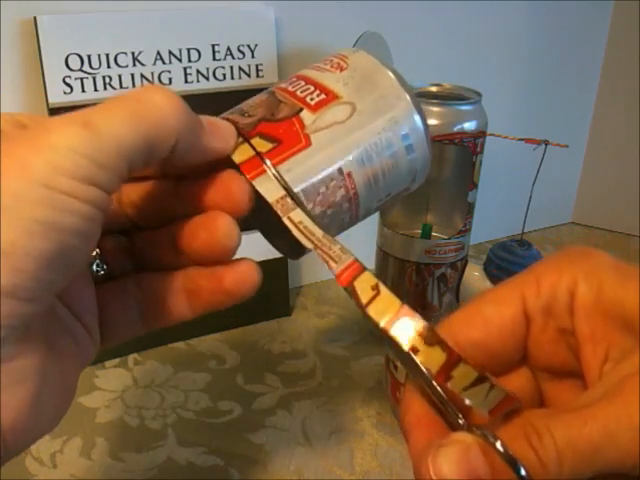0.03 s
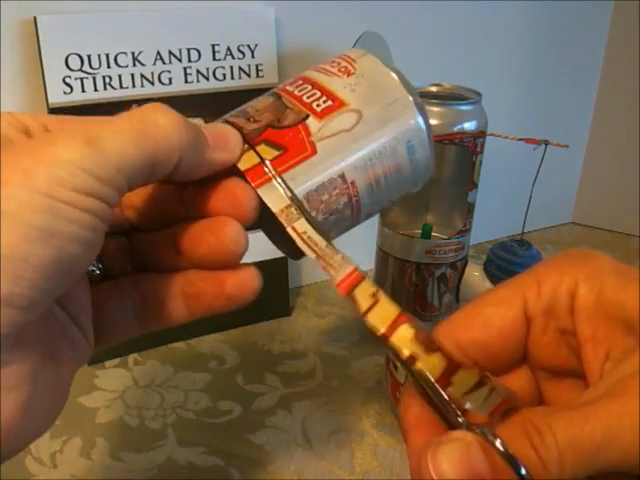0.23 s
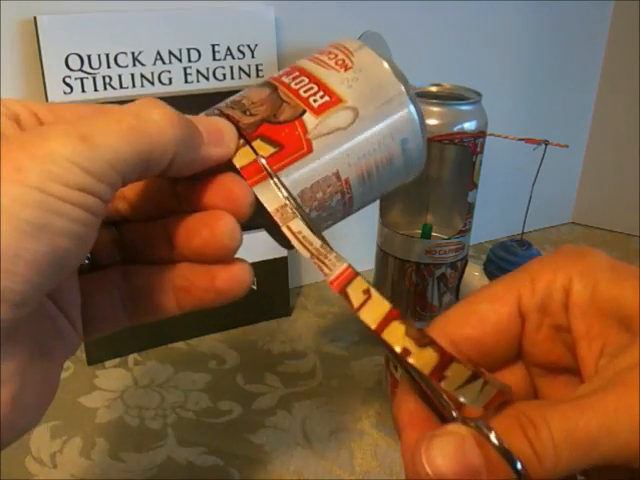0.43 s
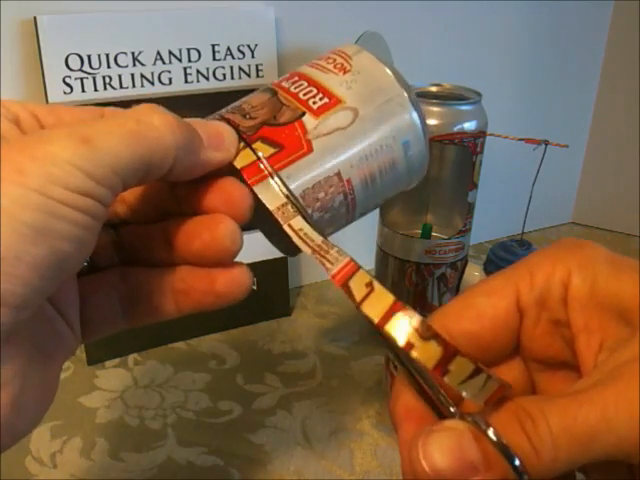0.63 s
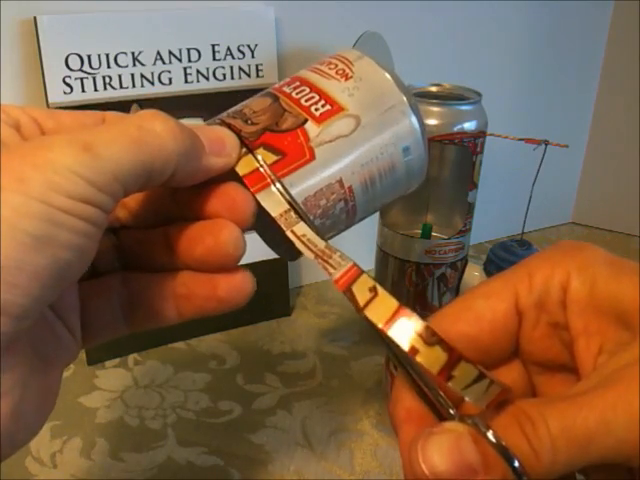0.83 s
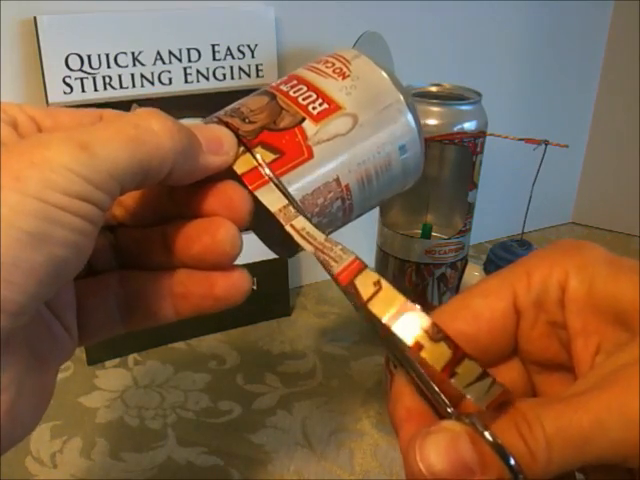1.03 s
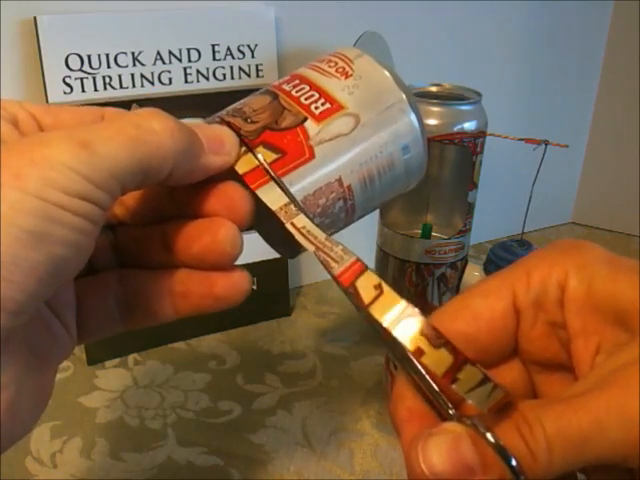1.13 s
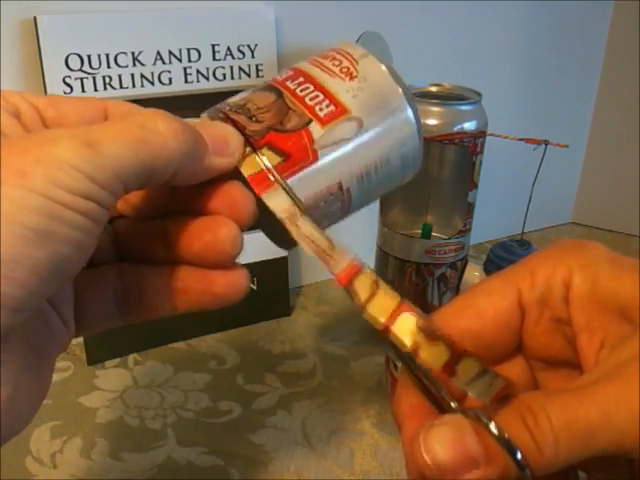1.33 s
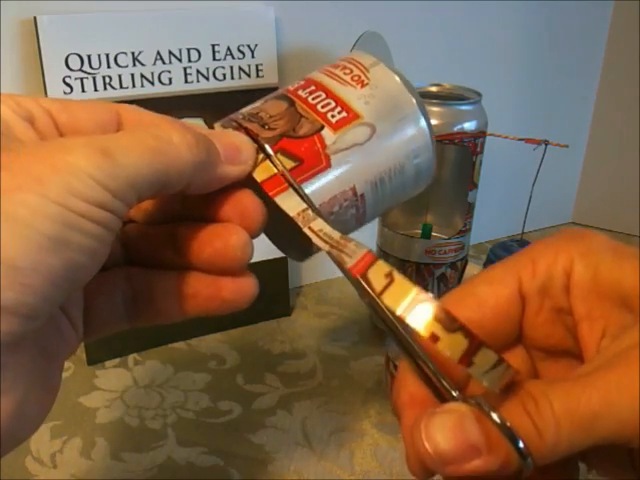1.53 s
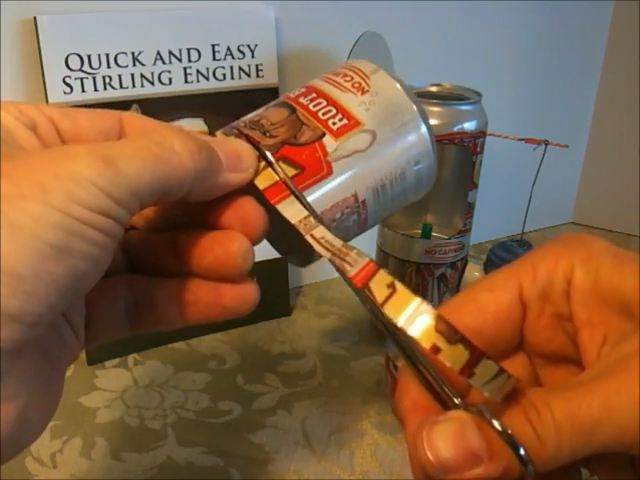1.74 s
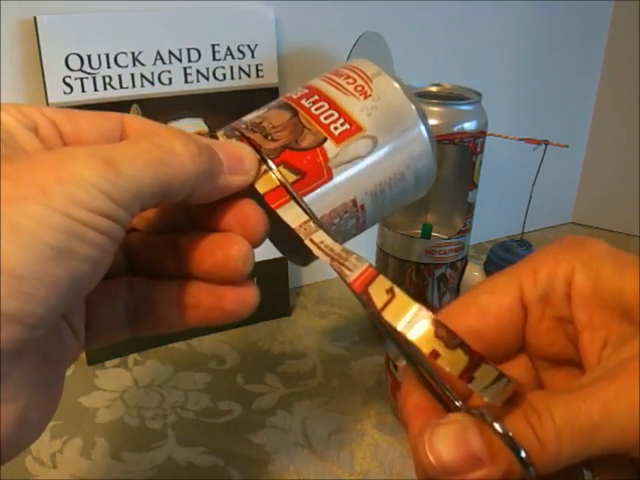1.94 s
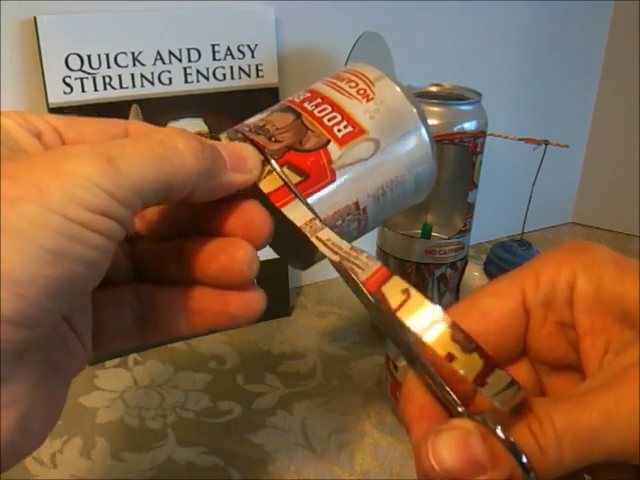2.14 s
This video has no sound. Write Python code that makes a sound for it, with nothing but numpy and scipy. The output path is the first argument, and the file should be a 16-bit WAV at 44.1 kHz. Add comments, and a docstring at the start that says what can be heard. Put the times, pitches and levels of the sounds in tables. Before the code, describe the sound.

Scissors snipping through a thin aluminium can in short, irregular metallic crunches.

```python
"""Scissors cutting an aluminium can

Scissors cut a thin hand-held can in a small quiet room. The blades rub and crunch through the sheet in
bursts of tiny fractures, and the sheet snaps as it gives way. Each crack excites the modes of can wall
and blades; sliding steel sings and the grip knocks softly. Table and walls reflect it all over a faint
steady hiss and hum."""
import sys
import numpy as np
from scipy import signal
from scipy.fft import rfft, irfft
from scipy.io import wavfile
from scipy.ndimage import uniform_filter1d

SR = 44100
rng = np.random.default_rng(int(sys.argv[2]) if len(sys.argv) > 2 else 0)


def master(y):
    """Save y as 16-bit WAV."""
    cut = np.clip(np.atleast_2d(y).T, -1, 1)
    pcm = np.round(cut * 32767)  # scale
    wavfile.write(sys.argv[1], SR, pcm.astype(np.int16))


N = 97020


def snaps(size=3072, lead_s=.008):
    """Brittle release of stress: the sheet gives way in cracks that die within milliseconds."""
    # Snaps; a low ring is the can wall, a high one the blades:
    # (time [s], level [dB], decay [s], bass [dB], ring [dB], ring pitch [Hz], treble [dB])
    fractures = [ (0.0884, -40.5, 0.002, 2.5, -30, 1010, -8.5), (0.1587, -43, 0.0039, -4, -1.5, 1000, -9),
                 (0.212, -21, 0.0026, -5, 9, 1125, 10), (0.5252, -31.5, 0.0031, -4, -3, 980, -4),
                 (.536, -35, 0.0038, 2, 3, 865, -5.5), (.5776, -38.5, 0.0019, 7, 11, 910, -2.5),
                 (0.6176, -41, 0.0033, -10, 1.5, 980, -17.5), (0.694, -60, .003, -2, 16.5, 990, -25.5),
                 (.7501, -31.5, .003, 7, 14, 864, -30.5), (0.8014, -33.5, 0.00503, 0.5, 7.5, 996, -6),
                 (.860, -52, 0.0042, -6, 6, 970, 0.5), (1.092, -53, .004, -8, 14.5, 6500, -9.5),
                 (1.194, -55.5, 0.0022, 7, 7, 1000, -10), (1.3384, -48.5, 0.0058, -22, 10, 5700, 4),
                 (1.3918, -39.5, 0.0017, -12, 13, 1190, -4), (1.580, -44.5, 0.0041, 2.5, 5, 5400, -5),
                 (1.608, -41, 0.0056, -6, 13, 6970, 0), (1.617, -37.5, .005, -2, 3, 6800, -15),
                 (1.645, -52, 0.0036, 1.5, 15, 1030, 0), (1.9633, -42, 0.0041, -0.5, -8, 860, -8),
                 (1.9789, -48, 0.0031, 11.5, 14, 824, -23.5), (1.9908, -36.5, 0.0016, -7.5, -8.5, 1000, -7),
                 (2.0358, -53, .002, 3, 1, 1000, -8), (2.061, -49, 0.0059, 2, -3, 960, -10)]
    out = np.zeros(N)
    for s, db, decay_s, *tone in fractures:
        add(out, s - lead_s, colour(amp(db) * crack(size, lead_s, decay_s), *tone))
    return out


def crack(size, lead_s, decay_s, attack_s=.0008, passes=6):
    """A brief impulse is broadband: a decaying noise burst with a flat spectrum, after a lead-in."""
    noise = rng.standard_normal(size)
    t = np.maximum(np.arange(size) / SR - lead_s, 0)
    envelope = np.exp(-t / decay_s) * np.minimum(t / attack_s, 1)
    for _ in range(passes):  # flatten in frequency and in time by turns
        phase = np.angle(rfft(noise * envelope))
        burst = irfft(np.exp(1j * phase))
        local_power = abs(uniform_filter1d(burst ** 2, size=41))
        noise = burst / np.sqrt(local_power + 1e-20)
    return burst * np.linalg.norm(envelope)


def crunches(size=6000):
    """Crackling noise: the closing blades set off a random train of tiny fractures of uneven size."""
    # Rubs and crunches: (time [s], length [s], level [dB], bass [dB], wall ring [dB], treble [dB])
    bursts = [ (.002, 0.087, -61, 2.5, -5, 1.5), (.082, 0.015, -55, 6, 6, -0.5),
              (0.167, 0.012, -60.5, 17.5, 3, -6), (0.2108, 0.0013, -33, -9.5, 3, 18.5),
              (.233, 0.0041, -39.5, 0.5, -1.5, -8.5), (0.479, 0.035, -65.5, -2, 7, -5.5),
              (0.5713, 0.005, -45, 2, 12, -21), (0.746, .007, -44, 0, 15.5, -1.5),
              (.785, 0.0064, -50, 12, 17, -45), (1.041, 0.033, -67, 4.5, 2, -7.5),
              (1.0845, 0.015, -50, -0.5, -0.5, -7), (1.106, 0.022, -53.5, 1.5, 4, -5),
              (1.148, 0.016, -61.5, 1, 7.5, -11), (1.357, .024, -63.5, -3, 7, -16),
              (1.385, 0.009, -49, -27, 12, -15), (1.415, 0.027, -40.5, -1, 7.5, -5),
              (1.437, 0.036, -46.5, 10, 12, -6.5), (1.474, 0.02, -57, 17.5, 4, -4),
              (1.52, .06, -66.5, 6.5, -13, -4), (1.948, 0.05, -53.5, 5.5, -1, -17),
              (2.15, 0.012, -70, -4, -13.5, -19)]
    grains_per_s, spread_db, wall_hz = 5000, 3.0, 990
    swell_share, release_s = 0.41, .003
    out, t = np.zeros(N), np.arange(size) / SR
    for s, length, db, bass_db, wall_db, treble_db in bursts:
        strength = amp(spread_db * np.minimum(rng.exponential(1, size), 3))
        polarity = rng.choice([-1, 1], size)
        grains = unit_rms(strength * polarity * (rng.random(size) < grains_per_s / SR))
        swell = np.minimum(t / (swell_share * length), 1)
        release = np.exp(-np.maximum(t - length, 0) / release_s)
        add(out, s, colour(amp(db) * swell * release * grains, bass_db, wall_db, wall_hz, treble_db))
    return out


def colour(x, bass_db, ring_db, ring_hz, treble_db, size=4096):
    """Minimum-phase filtering gives an event its bass, broad ring of wall or blades, and treble."""
    # Spectrum common to all cracks: (frequency [Hz], level [dB])
    crack_spectrum = [(25, -14.5), (90, -13), (140, -22.5), (200, -2.5), (300, 2), (420, 2), (650, 2.5),
                      (1350, 2), (1700, -3), (2200, 0.5), (2600, -3), (3100, 5), (3600, -1), (5000, 0),
                      (6500, 0), (8500, -1), (11000, -6.5), (13300, -4), (16000, -10.5)]
    bass_from_hz, bass_to_hz, treble_hz, ring_octaves = 130, 640, 9180, 0.23
    hz = abs(np.fft.fftfreq(size, 1 / SR)) + 1
    bass = bass_db / (1 + (hz / bass_to_hz) ** 4 + (bass_from_hz / hz) ** 4)
    ring = ring_db * np.exp(-.5 * (np.log2(hz / ring_hz) / ring_octaves) ** 2)
    treble = treble_db / (1 + (treble_hz / hz) ** 7)
    gain = amp(curve_at(crack_spectrum, hz) + bass + ring + treble)
    minimum_phase = np.exp(np.conj(signal.hilbert(np.log(gain))))
    response = np.fft.ifft(minimum_phase).real
    return signal.fftconvolve(x, response[:size // 2])


def metal(x):
    """Modal superposition: each crack is heard directly and through the modes of can and blades."""
    # Modes of can and blades: (frequency [Hz], peak gain [dB], T60 [s])
    modes = [(210, 0, .25), (431, 2, .11), (570, -4, .1), (850, 0, .08), (1012, -2, .09), (1137, -4, .11),
             (1320, -3, .08), (2155, 2, .06), (3195, -2, .11), (3919, -4, .11), (4640, 0, .06),
             (5035, 1, .05), (5172, 2, .07), (6450, 1, .04)]
    return x + sum(amp(db) * resonate(x, hz, width_hz=2.2 / t60) for hz, db, t60 in modes)


def resonate(x, hz, width_hz):
    """A damped oscillator responds most at its natural frequency, here with a gain of one."""
    radius = np.exp(-np.pi * width_hz / SR)
    pole = radius * np.exp(2j * np.pi * hz / SR)
    return 2 * signal.lfilter([1 - radius], [1, -pole], x).real


def slides(size=6000, blade_hz=3177, width_hz=86):
    """Friction of steel sliding on steel excites one narrow blade resonance."""
    # Blade strokes: (time [s], length [s], level [dB])
    strokes = [(.002, 0.073, -64.5), (0.442, 0.1, -75), (1.361, 0.052, -57), (1.51, 0.067, -77),
               (2.015, .09, -74)]
    out, t = np.zeros(N), np.arange(size) / SR
    for s, length, db in strokes:
        friction = rng.standard_normal(size)
        tone = resonate(resonate(friction, blade_hz, width_hz), blade_hz, width_hz)
        arch = np.sin(np.pi * np.minimum(t / length, 1))
        add(out, s, amp(db) * unit_rms(tone) * arch)
    return out


def thuds(size=9000, hz=205.6, attack_s=0.0084, decay_s=0.035):
    """Damped vibration: a shift of the grip gives a soft, low knock."""
    # Knocks of the hands on handles and can: (time [s], level [dB])
    knocks = [(0.086, -61.5), (1.093, -60.5), (1.348, -56.5), (1.443, -53), (1.958, -50.5), (2.059, -63.5)]
    out, t = np.zeros(N), np.arange(size) / SR
    envelope = np.minimum(t / attack_s, 1) * np.exp(-t / decay_s)
    for s, db in knocks:
        add(out, s, amp(db) * np.sin(2 * np.pi * hz * t) * envelope)
    return out


def room(x, stretches=22):
    """Time-varying paths: the hands keep moving, so each stretch meets its own reflections."""
    out = x.copy()
    for part in np.array_split(np.arange(N), stretches):
        add(out, part[0] / SR, signal.fftconvolve(x[part], echoes()))
    return out


def echoes(size=22050):
    """Impulse response: early reflections from can, hands and table, then the room's diffuse tail."""
    # Reverberation time of the room: (frequency [Hz], T60 [s])
    room_t60 = [(150, 0.14), (500, 0.45), (1400, 0.33), (4000, 0.32), (9000, 0.25), (15000, 0.16)]
    early_t60_s, tail_db, build_s = 0.055, -13.5, 0.032
    t = np.arange(size) / SR
    arrivals = rng.standard_normal(size) * (rng.random(size) < .15) * (t > .001)
    early = arrivals * amp(-60 * t / early_t60_s)
    hz, frame_s, bands = signal.stft(rng.standard_normal(size), SR, nperseg=256)
    decay = amp(-60 * frame_s / curve_at(room_t60, hz)[:, None])
    tail = signal.istft(bands * decay, SR, nperseg=256)[1][:size]
    tail *= np.minimum(t / build_s, 1)
    return early / np.linalg.norm(early) + amp(tail_db) * tail / np.linalg.norm(tail)


def background(hiss_db=-69.5, hum_hz=113.4, hum_db=-91):
    """Stationary noise floor: a steady hiss with a faint low hum."""
    # Spectral density of the hiss: (frequency [Hz], relative level [dB])
    hiss_spectrum = [(25, -31), (60, -18.5), (90, -21), (125, -2), (300, 1), (450, -3.5), (700, -7.5),
                     (1400, -9), (1900, -12.5), (3100, -14), (8000, -16), (15500, -17)]
    gain = amp(curve_at(hiss_spectrum, np.fft.rfftfreq(N, 1 / SR)))
    hiss = irfft(rfft(rng.standard_normal(N)) * gain)
    hum = np.sin(2 * np.pi * hum_hz * np.arange(N) / SR)
    return amp(hiss_db) * unit_rms(hiss) + amp(hum_db) * unit_rms(hum)


def amp(db):
    """Amplitude grows tenfold every 20 dB."""
    return 10 ** (np.asarray(db) / 20)


def unit_rms(x):
    """Normalisation to a mean power of one."""
    return x / np.sqrt(np.mean(x ** 2) + 1e-20)


def curve_at(points, hz):
    """Interpolation of (frequency [Hz], value) points on a logarithmic frequency axis."""
    point_hz, value = np.transpose(points)
    return np.interp(np.log(hz + 1), np.log(point_hz + 1), value)


def add(mix, s, sound):
    """Superposition: a sound joins the mix at s seconds."""
    part = mix[max(round(s * SR), 0):][:len(sound)]
    part += sound[:len(part)]


def scene():
    """Sound pressures add: the cutting, its reflections and the background, in one channel."""
    cutting = metal(snaps() + crunches()) + slides() + thuds()
    return (room(cutting) + background())[None]


def record(dry, cutoff_hz=15850):
    """Band limiting: a linear-phase low-pass removes the highest treble."""
    low_pass = signal.firwin(301, cutoff_hz, window=("kaiser", 9), fs=SR)
    return signal.oaconvolve(dry, low_pass[None], "same")


dry = scene()
out = record(dry)
master(out)
```